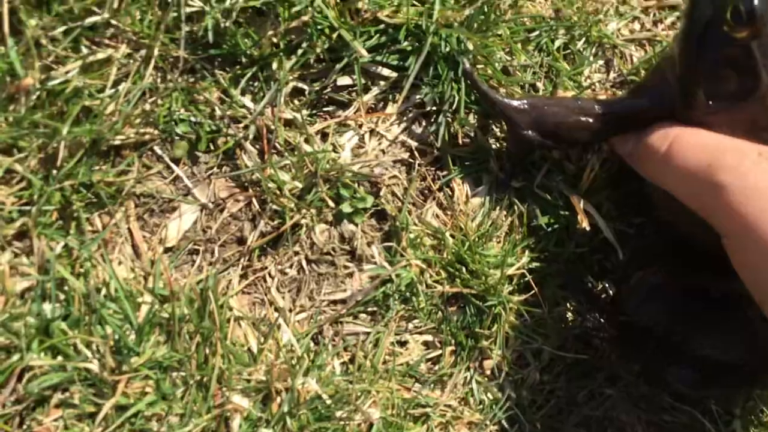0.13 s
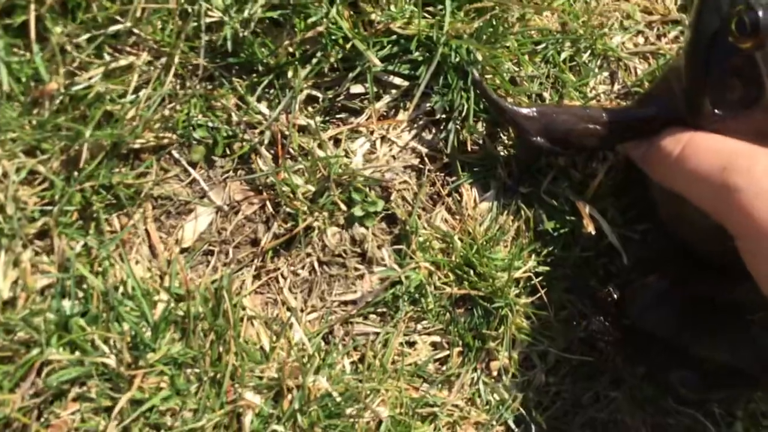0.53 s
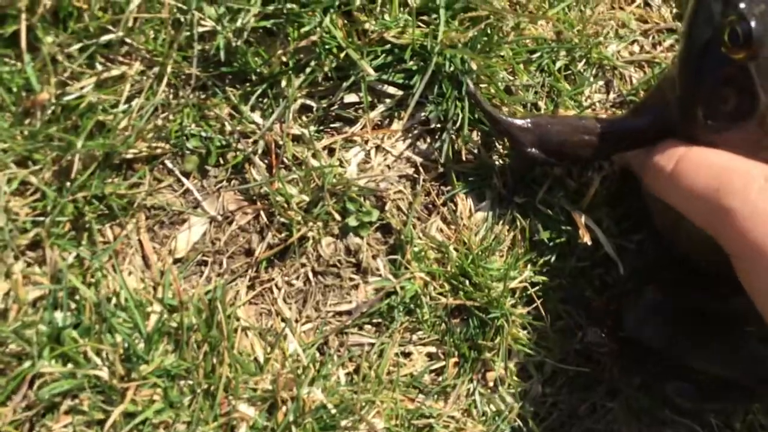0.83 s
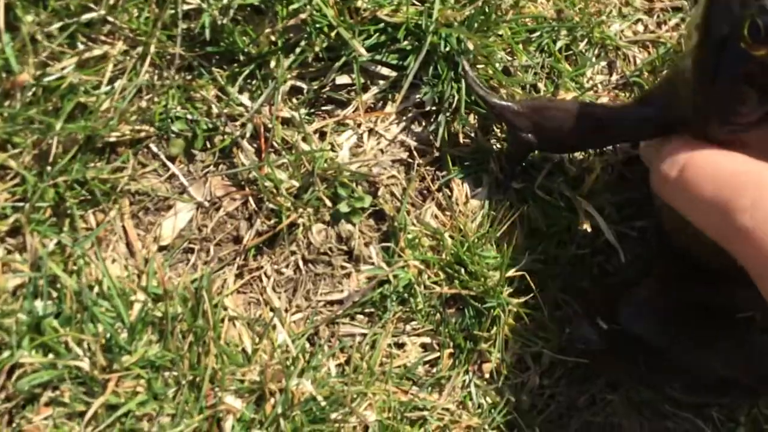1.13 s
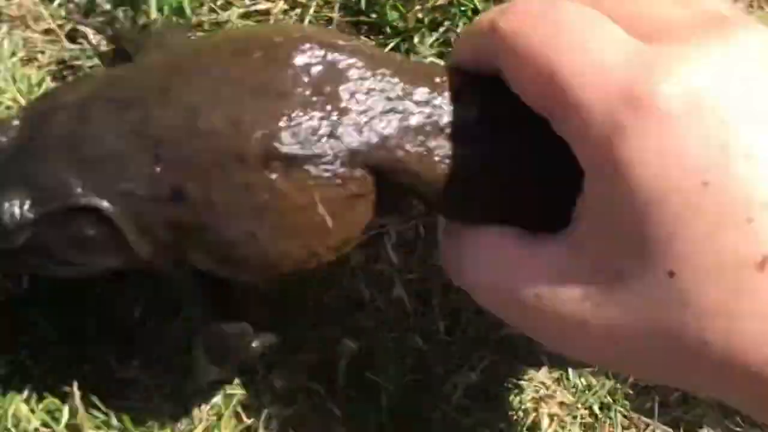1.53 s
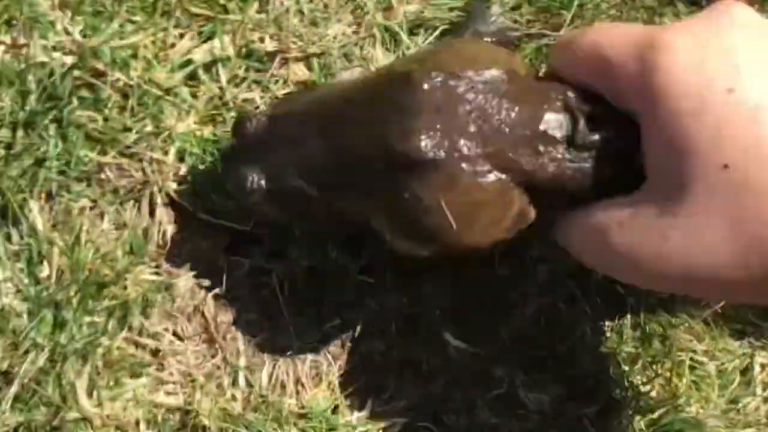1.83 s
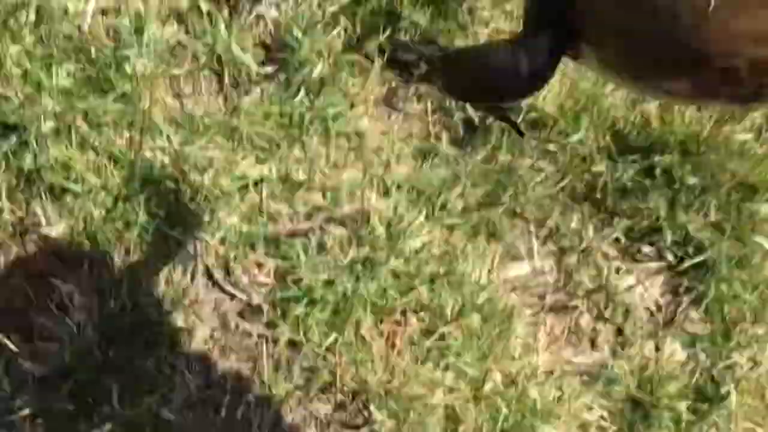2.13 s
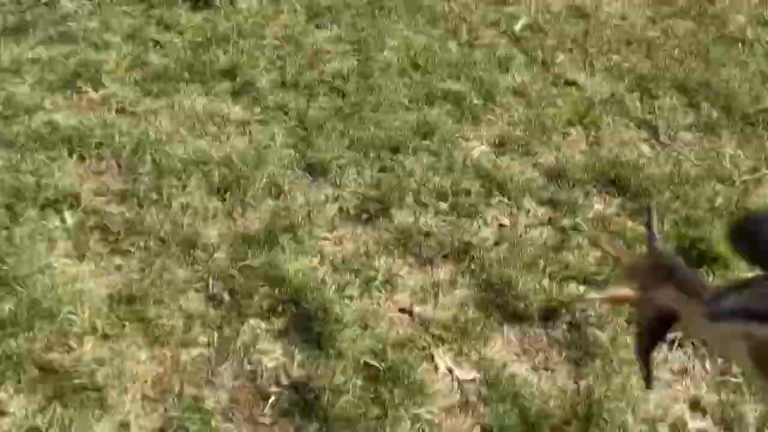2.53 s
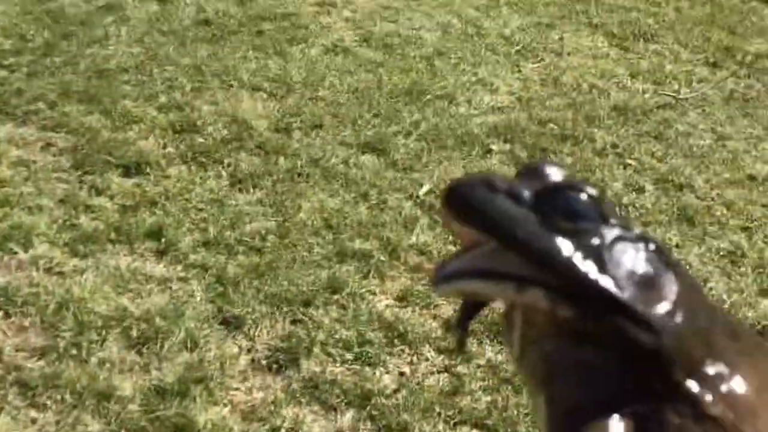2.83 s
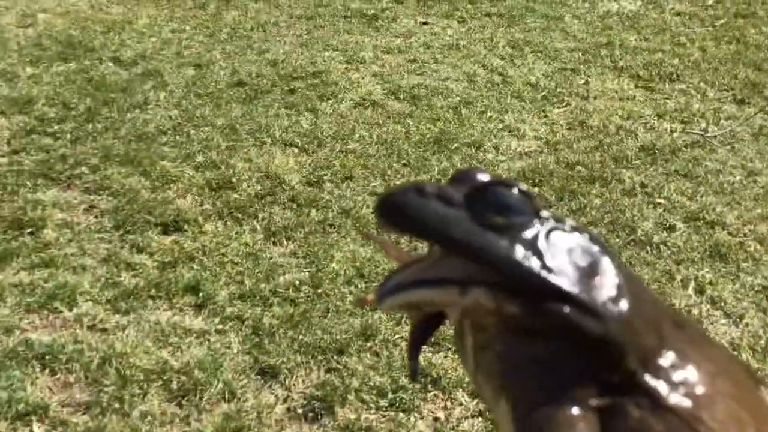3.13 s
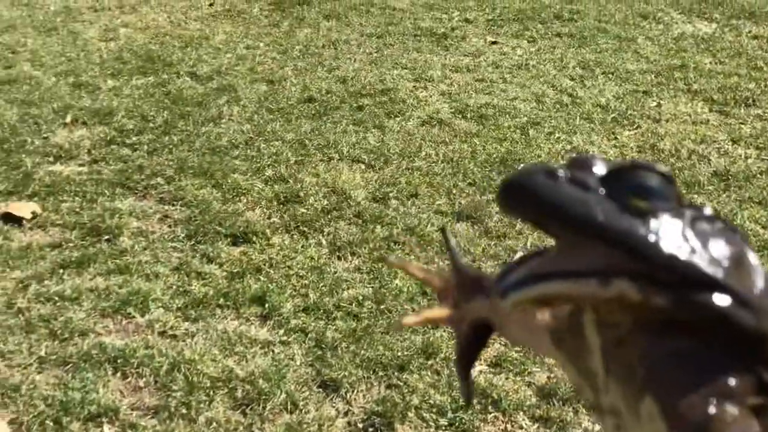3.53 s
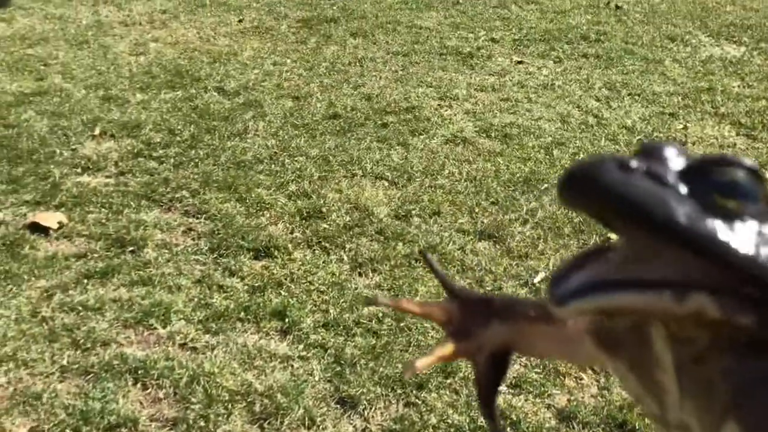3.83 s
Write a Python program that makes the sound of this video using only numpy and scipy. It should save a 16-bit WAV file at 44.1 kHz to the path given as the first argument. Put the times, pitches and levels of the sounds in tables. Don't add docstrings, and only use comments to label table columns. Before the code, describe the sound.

A frog held close outdoors: faint wind, air hiss, distant insects, soft hum and tiny rapid lens ticks at first, with nail taps and dull case bumps from 0.4 s. Brief creaks at 1.3-1.4 s, a rough muffled growl from 1.7 s, opening around 2 s into a buzzing, bright scream. Loud knocks hit at 2.07 and 2.53 s. The scream strengthens from 2.8 s, wavers and catches around 3.2-3.6 s, then drops lower and rasps to the end, over a faint drone.

```python
import sys
import numpy as np
from scipy import signal
from scipy.io import wavfile
from scipy.ndimage import uniform_filter1d

SR = 44100
rng = np.random.default_rng(int(sys.argv[2]) if len(sys.argv) > 2 else 0)


def pcm_store(signal):
    levels = np.round(np.clip(np.atleast_2d(signal), -1, 1) * 32767)
    wavfile.write(sys.argv[1], SR, levels.astype(np.int16).T)


def magnitude_from_level(level_db):
    exponent = np.asarray(level_db, float) / 20
    return 10 ** exponent


N = 176400
T = np.arange(N) / SR


def evened(x):
    return x / np.sqrt(np.mean(x ** 2) + 1e-20)


def columns(table):
    s, *cols = np.transpose(table)
    return [np.interp(T, s, c) for c in cols]


def cut(x, hz, kind, order):
    return signal.sosfilt(signal.butter(order, hz, kind, fs=SR, output="sos"), x)


def resonate(x, hz, width):
    turn = np.exp(2j * np.pi * np.cumsum(hz * np.ones(len(x))) / SR)
    r = np.exp(-np.pi * width / SR)
    return 2 * (turn * signal.lfilter([1 - r], [1, -r], x / turn + 1e-18)).real


def twice(x, hz, width):
    return resonate(resonate(x, hz, 2 * width), hz, width)


def ring(x, hz, width):
    lo, hi = width.min(), width.max()
    wide = (width - lo) / (hi - lo + 1)
    return (1 - wide) * resonate(x, hz, lo) + wide * resonate(x, hz, hi)


def clicks(at_s, size):
    at, k, out = at_s * SR, np.arange(-8, 9), np.zeros(N)
    i = np.round(at).astype(int)[:, None] + k
    u = i - at[:, None]
    np.add.at(out, np.clip(i, 0, N - 1), size[:, None] * np.sinc(u) * np.cos(np.pi * u / 18) ** 2)
    return out


def coloured(points, patchy_db, span):
    hz = np.fft.rfftfreq(1024, 1 / SR)
    real, imag, patches = rng.standard_normal((N // 256 + 5, 513, 3)).T
    patches = uniform_filter1d(patches, size=span, axis=0)
    patches = evened(uniform_filter1d(patches, size=6, axis=1))
    f, db = np.transpose(points)
    shape_db = np.interp(np.log(hz + 1), np.log(f + 1), db)
    z = (real + 1j * imag) * magnitude_from_level(shape_db[:, None] + patchy_db * patches)
    return evened(signal.istft(z, nperseg=1024, noverlap=768)[1][:N])


# (frequency [Hz], density [dB per Hz])
WIND = [(15, -38), (25, -7.5), (80, 2), (181, -6.5), (275, -21.5), (334, -12), (474, -29.5), (700, -27.5),
        (910, -75), (1540, -120)]
# (time [s], wind level [dB])
GUSTS = [(.07, -44), (.2, -49), (.6, -51), (.75, -44), (1.0, -50), (1.15, -43.5), (1.27, -48), (1.45, -44),
         (1.62, -39), (1.7, -42), (2.0, -35.5), (2.12, -38), (2.25, -45), (2.7, -49), (3.0, -58),
         (3.6, -56), (3.7, -47), (3.8, -50.5)]


def wind():
    return magnitude_from_level(columns(GUSTS)[0]) * coloured(WIND, patchy_db=3.5, span=6)


# (frequency [Hz], density [dB])
AIR = [(200, -9.5), (400, -3.5), (900, -13.5), (1400, -11.5), (2300, -13), (4300, -18.5), (6000, -31),
       (15500, -38)]


def air():
    return magnitude_from_level(-68) * coloured(AIR, patchy_db=0.0, span=30)


def insects():
    chorus = rng.standard_normal(N)
    for _ in range(3):
        chorus = resonate(chorus, 2900, 2 * 260)
    return magnitude_from_level(-71) * evened(chorus)


def hum():
    return magnitude_from_level(-60.5) * evened(twice(rng.standard_normal(N), 226.6, 4.8))


def lens_ticks():
    ticks_per_s, ring_hz, level_db, spread_db = 30, 4400, -62, 3
    s = np.arange(3, 119) / ticks_per_s
    sizes = magnitude_from_level(level_db + spread_db * rng.standard_normal(len(s)))
    return twice(clicks(s, sizes), ring_hz, 940.0) * 9


# (time [s], peak [dB], low ring [Hz], high ring [Hz], high ring level [dB])
TAPS = [(.391, -39.5, 1370, 4100, -7), (.743, -21, 1830, 2840, -26), (0.882, -46.5, 1430, 2100, -13),
        (1.02, -30, 1630, 3900, 1.5), (1.476, -16, 2490, 3570, 1.5), (1.556, -24.5, 2360, 3450, 3),
        (1.606, -28.5, 2100, 3480, -40), (1.623, -33, 1310, 1990, -13), (1.654, -10, 1430, 2900, 8.5),
        (1.927, -21.5, 1210, 3570, 22), (2.065, -17.5, 1890, 2900, -14), (2.123, -25.5, 2340, 3860, -24),
        (2.19, -35, 1240, 3730, -14), (2.532, 5.5, 1320, 3200, 4), (2.596, -26, 1620, 4040, -8)]


def taps():
    contact_s, ring_width_hz, crack_db = 0.000095, 800, -27
    t, out = T[:3000], np.zeros(N + 3000)
    for s, db, hz, top_hz, top_db in TAPS:
        hit = (1 + 1.33 * rng.standard_normal(len(t))) * t / contact_s * np.exp(-t / contact_s)
        low_ring = evened(twice(hit, hz, ring_width_hz))
        high_ring = evened(twice(hit, top_hz, 1.45 * ring_width_hz))
        crack = evened(cut(cut(hit, 3600, "high", order=2), 4500, "low", order=3))
        wave = low_ring + magnitude_from_level(top_db) * (high_ring + magnitude_from_level(crack_db) * crack)
        wave = cut(wave, 7800, "low", order=2)
        out[round(s * SR):][:len(t)] += magnitude_from_level(db) * wave / abs(wave).max()
    return out[:N]


# (time [s], peak [dB], duration [ms])
BUMPS = [(0.726, -24.5, 7.2), (0.741, -29, 3.9), (1.02, -34.5, 4.1), (1.085, -22.5, 13),
         (1.160, -41.5, 9.6), (1.450, -35, 6.8), (1.517, -31.5, 4.5), (1.607, -22.5, 4.1),
         (1.614, -24, 10.2), (1.622, -24, 10.4), (1.653, -19, 4.7), (1.745, -38, 3.5), (1.924, -16.5, 3),
         (1.849, -38, 2.7), (1.984, -30, 13.7), (2.055, -22, 6), (2.065, -5.5, 5.66), (2.192, -24, 2.63),
         (2.219, -25, 13), (2.531, -2.5, 3.98), (2.595, -12, 4.17), (2.69, -37, 9)]


def bumps():
    turns, sweep = 1.209, 0.18
    t, out = T[:3000], np.zeros(N + 3000)
    for s, db, ms in BUMPS:
        age = 1000 * t / ms
        wave = np.sin(2 * np.pi * turns * np.log(1 + age / sweep))
        wave = wave * np.exp(-age) * (1 - np.exp(-5 * age))
        out[round(s * SR):][:len(t)] += magnitude_from_level(db) * wave / abs(wave).max()
    return out[:N]


# (time [s], low knock [dB], ring level [dB], ring frequency [Hz])
CREAKS = [
    (1.327, -33.5, -44.5, 960),
    (1.348, -36, -40.5, 900),
    (1.364, -41, -42, 1000),
    (1.382, -56, -47, 1360),
    (1.39, -64, -50, 1100),
    (1.400, -52, -55, 1300),
    (1.41, -60, -53, 1200),
    (1.419, -62, -57, 1200),
]


def creaks():
    knock_hz, knock_s, ring_s, sag = 335, 0.0027, .0015, 0.51
    t, out = T[:1500], np.zeros(N + 1500)
    knock = (t / knock_s * np.exp(1 - t / knock_s)) ** 2 * np.sin(2 * np.pi * knock_hz * t)
    bend = 1 + sag * (2 * np.exp(-t / 0.0022) - 1)
    swell = t / ring_s * np.exp(1 - t / ring_s)
    for s, low_db, ring_db, hz in CREAKS:
        chirp = swell * np.sin(2 * np.pi * np.cumsum(hz * bend) / SR)
        out[round(s * SR) - 40:][:len(t)] += magnitude_from_level(low_db) * knock + magnitude_from_level(ring_db) * chirp
    return out[:N]


# (time [s], pulse rate [Hz], timing jitter [ms], snap lag [ms], snap scatter [ms])
FOLDS = [(1.70, 140.7, 0.41, 1.6, 0.54), (1.76, 150.9, 0.38, 3.7, 0.63), (1.85, 137.3, 0.28, 4.1, 0.41),
         (2.0, 165, 0.35, 2.83, 0.6), (2.2, 177.8, 0.4, 2.4, 0.83), (2.24, 225.3, 0.27, 2.32, 0.57),
         (2.36, 233, 0.18, 1.56, 0.56), (2.55, 241.5, 0.026, 1.08, 0.34), (2.8, 250.1, 0.059, 0.58, 0.25),
         (3.17, 247.6, 0.14, 0.63, 0.3), (3.22, 239.7, 0.12, 0.65, 0.27), (3.32, 232.3, 0.1, 0.77, 0.28),
         (3.38, 222.2, 0.062, 0.78, 0.254), (3.41, 206.7, 0.024, .7, 0.31),
         (3.585, 212.9, 0.036, 0.91, 0.21), (3.625, 189.4, 0.0049, 1.63, 0.053),
         (3.8, 180.8, 0.029, 1.89, 0.12), (3.83, 182.1, 0.075, 1.88, 0.068),
         (4.0, 176.1, 0.0043, 1.7, 0.038)]
# (time [s], rise [Hz])
CATCHES = [(3.212, 18), (3.241, 19.4), (3.264, 20), (3.282, 34), (3.302, 20.15), (3.317, 14.3),
           (3.343, 29.4), (3.395, 45), (3.44, 44), (3.483, 56.3), (3.508, 49.5), (3.549, 63), (3.581, 43)]


def vocal_folds():
    hz, jitter, lag, scatter = columns(FOLDS)
    rush = sum(rise * np.exp(np.minimum(T - s, 0) / 0.015) * (T < s) for s, rise in CATCHES)
    rate = hz + rush
    turns = np.cumsum(rate) / SR
    i = np.flatnonzero(np.diff(np.floor(turns)) > 0)
    luck = rng.standard_normal((5, len(i)))
    at = (i + (1 - turns[i] % 1) * SR / rate[i]) / SR + jitter[i] * luck[0] / 1000
    even = magnitude_from_level(1.5 * rush[i] / 40) / np.sqrt(hz[i] / 240)
    thud_db = 2.3 * np.minimum(scatter[i] / .3, 1) * luck[1]
    thuds = clicks(at, even * magnitude_from_level(thud_db))
    late = at + abs(lag[i] + scatter[i] * luck[2]) / 1000
    snap_db = 2 + rush[i] / 40 + 3.5 * np.minimum(scatter[i] / 0.7, 1.3) * luck[3]
    snaps = clicks(late, even * magnitude_from_level(snap_db))
    echoes = clicks(at + lag[i] / 1000, even)
    puff = signal.lfilter([1], [1, -np.exp(-1 / (0.00034 * SR))], abs(thuds) + abs(snaps))
    return thuds, snaps, echoes, puff


# (frequency [Hz], width [Hz], level [dB])
THROAT = [(420, 252, -5.5), (735, 189, 1.5), (1149, 168, -1.5), (1590, 340, -3.5)]
# (time [s], frequency [Hz])
LIFT = [(1.7, 700), (2.4, 704), (3.3, 685), (3.42, 870), (3.6, 780), (4.0, 800)]


def throat(x):
    y = np.zeros(N)
    for k, (hz, width, db) in enumerate(THROAT):
        centre = columns(LIFT)[0] if k == 1 else hz
        y += (-1) ** k * magnitude_from_level(db) * resonate(x, centre, width)
    y = cut(y, 215, "high", order=3)
    shut = np.clip((1.96 - T) / 0.088, 0, 1)
    return shut * cut(y, 1590, "low", order=10) + (1 - shut) * cut(y, 2084, "low", order=4)


# (frequency [Hz], width [Hz], level at 1 s [dB], growth [dB per s])
SHEEN = [(7860, 2000, -53.5, 12), (9430, 360, -44, 9.5), (12900, 2040, -30, 1.5), (15200, 2400, -37, 2)]


def thin_edge(drive, thuds, snaps, puff):
    hiss = magnitude_from_level(-9) * puff * rng.standard_normal(N)
    x = drive - .3 * thuds + 0.55 * snaps + hiss
    return sum(magnitude_from_level(db + per_s * (T - 1)) * twice(resonate(x, f, 2 * w), f, w) for f, w, db, per_s in SHEEN)


# (time [s], jaw [Hz], cheek [Hz], palate [Hz], main resonance width [Hz], edge level [dB])
HOLLOWS = [(1.7, 2340, 4000, 7000, 378, 11), (2.1, 2400, 4300, 6900, 432, 6),
           (2.24, 2480, 4200, 5100, 430, 3), (2.33, 2565, 4500, 6400, 454, 3),
           (2.5, 2500, 5000, 5840, 450, 4), (2.7, 2350, 4770, 5730, 486, 4.5),
           (2.85, 2400, 4500, 5730, 605, -2.5), (3.2, 2310, 4580, 5800, 650, -5.5),
           (3.58, 2360, 4960, 6280, 640, -11.5), (3.65, 2900, 5000, 6370, 540, -6),
           (3.8, 2900, 5080, 6280, 540, -4.5), (4.0, 2730, 5300, 6670, 540, 1)]
# (width [Hz], level [dB])
UPPER = [(450, 4), (500, 3.5), (750, 8)]


def open_mouth(front, back, edge, mouth_hz):
    *hollows, width, edge_db = columns(HOLLOWS)
    main = front
    for widening in (1, 2, 3):
        main = ring(main, mouth_hz, widening * width)
    upper = magnitude_from_level(edge_db) * edge
    for k, (hz, (w, db)) in enumerate(zip(hollows, UPPER)):
        upper = upper + (-1) ** k * magnitude_from_level(db) * twice(back if k else front, hz, w)
    return main, upper


# (time [s], effort [dB], mouth resonance [Hz], mouth opening [dB], facing [dB])
BODY = [(1.695, -44, 1430, -26, -37), (1.72, -52, 1390, -27, -32), (1.755, -38, 1350, -21.5, -12),
        (1.8, -49.5, 1270, -17, -8), (1.94, -51, 1290, -6, -10.5), (1.985, -42.5, 1570, 2, -20),
        (2.03, -47.5, 2900, 10, -26), (2.12, -43, 3320, 0.5, -35), (2.25, -46, 3320, 2, -16.5),
        (2.44, -39.5, 3590, -1.5, -16.5), (2.62, -40, 3740, 0.5, -14.5), (2.72, -40, 3610, 3.5, -9),
        (2.84, -35.5, 3760, 2, 1), (3.0, -36, 3850, 2, 3.5), (3.3, -36, 3800, -0.5, 2.5),
        (3.58, -36, 3650, 1.5, 0.5), (3.65, -34.5, 3526, 0, 3), (4.0, -33.5, 3720, 0.5, 3)]


def cry():
    effort, mouth_hz, opening, facing = columns(BODY)
    thuds, snaps, echoes, puff = vocal_folds()
    drive = thuds - snaps + magnitude_from_level(-24) * puff * rng.standard_normal(N)
    edge = thin_edge(drive, thuds, snaps, puff)
    drive = cut(drive, 6600, "low", order=6)
    front = drive + (1 - .7) * snaps
    back = drive - (1 - .62) * cut(thuds, 6600, "low", order=6)
    main, upper = open_mouth(front, back, edge, mouth_hz)
    spike = cut(cut(thuds - 0.2 * snaps, 6460, "low", order=7), 1100, "high", order=1)
    low = throat(thuds - 0.1 * echoes - .14 * snaps)
    radiated = evened(main) - magnitude_from_level(facing) * evened(upper) + magnitude_from_level(-9.5 + 0.41 * facing) * evened(spike)
    onset = np.clip((T - BODY[0][0]) / 0.015, 0, 1)
    return -magnitude_from_level(effort) * onset * (evened(low) + magnitude_from_level(opening) * radiated)


def drone():
    tone = evened(twice(rng.standard_normal(N), 110.4, 4.3))
    return magnitude_from_level(-55) * tone * np.clip((T - 3.02) / 0.073, 0, 1)


def scene():
    outdoors = wind() + air() + insects() + hum() + lens_ticks()
    handling = taps() + bumps()
    return (outdoors + handling + creaks() + cry() + drone())[None]


def top_cut(x):
    return signal.sosfilt(signal.butter(12, 16520, fs=SR, output="sos"), x)


def record(dry):
    x = cut(cut(dry, 50, "high", order=3), 15850, "low", order=16)
    x = x * np.clip((T - .069) / 0.003, 0, 1)
    return top_cut(np.clip(x, -1, 1))


dry = scene()
out = record(dry)
pcm_store(out)
```